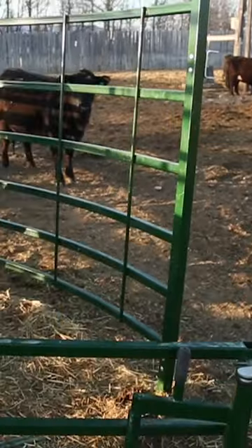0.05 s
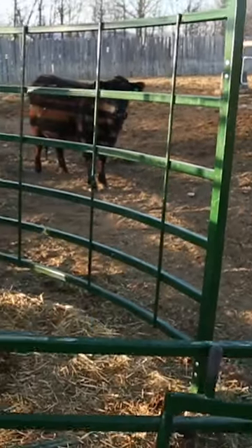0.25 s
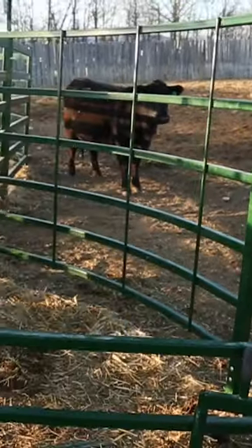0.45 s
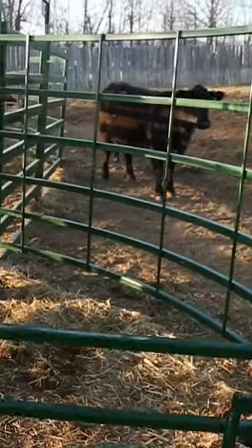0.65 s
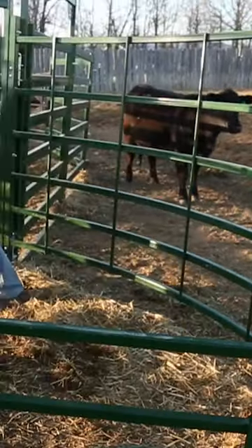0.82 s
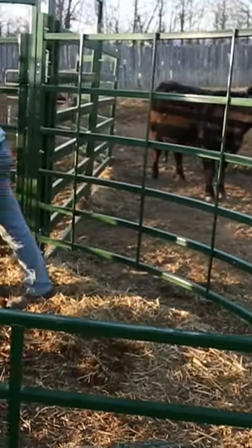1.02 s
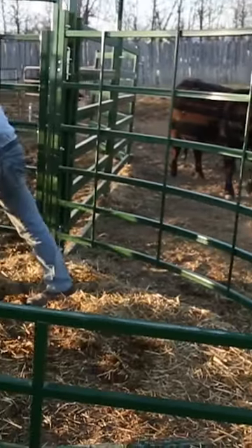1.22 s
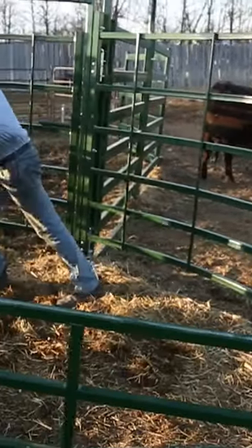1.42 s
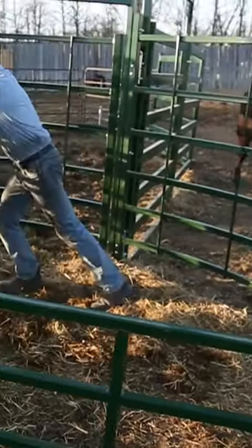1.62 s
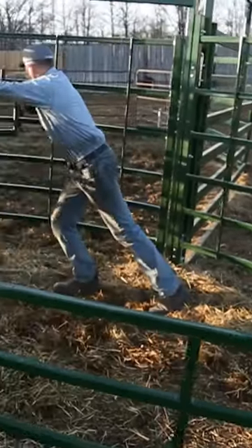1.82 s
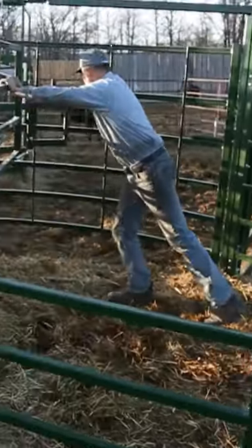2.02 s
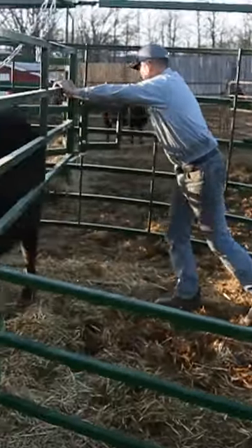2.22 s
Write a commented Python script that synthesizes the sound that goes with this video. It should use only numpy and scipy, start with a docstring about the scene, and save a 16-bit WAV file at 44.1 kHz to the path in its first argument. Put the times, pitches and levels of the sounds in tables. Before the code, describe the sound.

In an outdoor cattle pen, a nearby steel gate clangs loudly and rings, followed by a bright latch clink. A second round of bangs and clinks gives way to soft steps on straw and dirt.

```python
"""A straw-covered cattle pen, in faint outdoor air. A man pushes a curved steel tube gate round.
It bangs and rattles against the panels: each blow is a crack, a clash of tubes and a long panel ring.
Loose fittings ping, and the latch and a loose link clink in clear, high steel modes.
Feet rustle the straw in brief crackles and land on the dirt with dull thuds."""
import sys
import numpy as np
from scipy import signal
from scipy.fft import rfft, irfft
from scipy.io import wavfile

SR = 44100
rng = np.random.default_rng(int(sys.argv[2]) if len(sys.argv) > 2 else 0)


def file_out(sig):
    """Save sig as 16-bit WAV at sys.argv[1]."""
    # one column per channel
    cols = np.atleast_2d(sig).T
    # limit, then scale
    lim = np.clip(cols, -1, 1)
    pcm = np.round(lim * 32767).astype(np.int16)
    wavfile.write(sys.argv[1], SR, pcm)


N = 103635
T = np.arange(2 ** 16) / SR  # time axis of one hit, s


def amp(db):
    """Decibels to gain."""
    return 10 ** (np.asarray(db) / 20)


def unit(x):
    """Scales to rms 1."""
    return x / np.sqrt(np.mean(x ** 2) + 1e-20)


def curve_at(points, hz):
    """Reads a curve on a log-frequency axis."""
    f, value = np.transpose(points)
    return np.interp(np.log(hz + 1), np.log(f + 1), value)


def add(mix, start, sound):
    """Mixes a sound in at a time in seconds."""
    part = mix[max(round(start * SR), 0):][:len(sound)]
    part += sound[:len(part)]


def freqs(x):
    """Frequencies of the spectrum of x."""
    return np.fft.rfftfreq(len(x), 1 / SR)


def colour(x, eq):
    """Shapes x with an EQ curve, at rms 1."""
    return unit(irfft(rfft(x) * amp(curve_at(eq, freqs(x))), len(x)))


def treble_shelf(x, db, edge_hz=4300):
    """Lifts or lowers the treble."""
    return irfft(rfft(x) * amp(db / (1 + (edge_hz / (freqs(x) + 1)) ** 2)))


def rise(seconds):
    """A linear attack to full level."""
    return np.minimum(T / max(seconds, 1e-4), 1)


def grains(size, spread_db):
    """A dense run of tiny clicks of uneven size."""
    return rng.standard_normal(size) * amp(spread_db * np.minimum(rng.exponential(1, size), 4))


def mode_cloud(count, uneven_db=4):
    """Strengths of many close modes at random frequencies."""
    bins = len(freqs(T))
    return (rng.permutation(bins) < count) * amp(uneven_db * np.clip(rng.standard_normal(bins), -2, 2))


def strike(cloud, eq, decay):
    """Rings a mode cloud with fresh phases; each frequency dies at its own speed."""
    phases = np.exp(2j * np.pi * rng.random(len(cloud)))
    sustained = colour(irfft(cloud * phases), eq)
    hz, t, bands = signal.stft(sustained, SR, nperseg=256)
    fade = amp(-60 * t / curve_at(decay, hz)[:, None])
    return signal.istft(bands * fade, SR, nperseg=256)[1][:len(sustained)]


def flutter(depth_db=2.5, bandwidth_hz=55.4):
    """A quick random wavering of level."""
    noise = rng.standard_normal(len(T))
    wobble = irfft(rfft(noise) * np.exp(-(freqs(T) / bandwidth_hz) ** 2))
    return amp(depth_db * unit(wobble))


def ring(pitches, modes, twin_db=-9, max_beat_hz=18):
    """Decaying modes that flutter; each beats with a weaker twin, as in a slightly oval tube."""
    out, wavering = np.zeros(len(T)), flutter()
    for hz, (db, t60) in zip(pitches, modes):
        phase, twin_phase, split, lag = rng.random(4)
        tone = np.sin(2 * np.pi * (hz * T + phase))
        twin = np.sin(2 * np.pi * ((hz + max_beat_hz * (2 * split - 1)) * T + twin_phase))
        envelope = amp(db - 60 * T / t60) * np.roll(wavering, int(lag * len(T)))
        out += envelope * (tone + amp(twin_db) * twin)
    return out


# tone of the air bed: f/Hz, level/dB
AIR_EQ = [(25, -10), (65, 3.5), (150, 5), (400, 9.5), (1100, 7), (1700, 2.5), (5000, -4.5), (9000, -8.5),
          (16000, -15)]


def air():
    """Outdoor air: a faint, steady bed of soft noise."""
    return amp(-65.5) * colour(rng.standard_normal(N), AIR_EQ)


# gate blows, the last one a small bright clink: t/s, level/dB, attack/s, bass/dB, treble/dB, panel ring/dB,
# panel treble/dB, contact peak f/Hz, its boost/dB, gate modes/dB, post modes/dB
GATE_BLOWS = [(.036, -20.5, 0.042, 6.5, 14, 0.5, -4.5, 3300, 1, -2.5, -26),
              (.173, -15, 0.027, 10, 5, 3, 5.5, 2800, -2, -5, -4),
              (0.2484, -0.5, 0.00073, -8, -2, -1, 0, 2660, 3.5, 0.5, -29),
              (0.2581, -2, .0005, -2, -2.5, 1.5, -3.5, 1610, 6, -0.5, -26),
              (.482, -15.5, 0.011, 6.5, 4.5, 6, 1, 2360, 1.5, -1, -12),
              (.515, -20.5, 0.017, 13.5, 12.5, -4.5, 5.5, 230, 8, 0.5, -5),
              (.783, -32, 0.0086, -8.5, -9, -22, -8.5, 2560, 14.5, -21, -25),
              (1.334, -4, 0.0046, -2.5, 3.5, -2, -9.5, 5020, 1.5, -25, 0),
              (1.361, -11.5, 0.00095, 4, -11, -7, 8, 2880, 7.5, -10, -2),
              (1.522, -13, 0.0089, 8.5, -7.5, -2, -2, 1020, 9.5, -31, -1.5),
              (1.545, -10.5, 0.0035, 2.5, -0.5, -1.5, -7, 1050, 6, -13, -5.5),
              (1.563, -14, 0.003, 3, 2.5, -2.5, -8, 1280, 10, -5, -10),
              (2.15, -33.5, 0.017, 3, -6, 1, 1, 2430, 6.5, 0, -15),
              (2.3288, -23.5, 0.0013, -3, 10, -22, 0, 11400, 9, -13, -4)]
# first clash of the struck tubes: f/Hz, level/dB
TUBE_EQ = [(30, -70), (70, -30.5), (180, -16.5), (380, -16), (600, -7), (800, -5.5), (1250, -4.5),
           (1900, 0.5), (2700, 1.5), (4000, -4.5), (5200, -4), (7000, -14.5), (11000, -26), (14000, -27.5),
           (16000, -43)]
# its decay: f/Hz, t60/s
TUBE_DECAY = [(100, 0.72), (500, 0.5), (2000, 0.35), (5000, 0.31), (14000, 0.3)]
# long ring of the joined panels: f/Hz, level/dB
PANEL_EQ = [(40, -44), (120, -11.5), (250, -2), (350, -12), (460, 0.5), (600, -5), (750, -2), (1050, -0.5),
            (1500, -2.5), (2600, -1), (3300, -2), (4200, -12), (7000, -15), (11000, -25.5), (16000, -30.5)]
# its decay: f/Hz, t60/s
PANEL_DECAY = [(100, 1.2), (280, 0.47), (450, 1.63), (700, 0.85), (1200, 1.466), (2400, 0.9), (5000, 1.2),
               (14000, 1.56)]
# strongest modes of the gate: f/Hz
GATE_PITCHES = [296, 447, 618, 914, 1007, 1276, 1583, 1700, 1833, 1944, 2460, 2531, 3321, 4915]
# how each rings: level/dB, t60/s
GATE_RING = [(-11.5, 0.74), (-19, 2.6), (-3, 0.51), (-11, .7), (-6.5, 1.43), (-11, 1.24), (-4.5, 0.58),
             (-8, .9), (-10.5, 1.2), (-7.5, 0.95), (-9, .7), (-3, 0.78), (-3, 0.42), (-7, 0.41)]
# strongest modes of the post and panel it shuts against: f/Hz
POST_PITCHES = [213, 460, 1023, 1066, 1292, 1475, 2050, 2167, 2598, 2806, 2948, 3238, 3924, 4968]
# how each rings: level/dB, t60/s
POST_RING = [(-15.5, 0.64), (-20, 3.8), (-14, 1.4), (-16, 1.3), (-14, 1.2), (-5, 1.2), (6, .5), (-1, .75),
             (0.5, 1), (-9, 1), (3, 0.28), (-2, .7), (4.5, 0.13), (4, 0.18)]


def gate():
    """Each blow cracks, clashes in the near tubes and spreads into the ringing panels."""
    out, hz = np.zeros(N), freqs(T)
    tubes, panels = mode_cloud(count=2400), mode_cloud(count=2400)
    fade_out = np.clip(2 * (T[-1] - T) - .5, 0, 1)
    for (start, db, attack, bass_db, treble_db, panel_db, panel_treble_db,
         contact_hz, contact_db, gate_db, post_db) in GATE_BLOWS:
        crack = amp(-20.5) * colour(grains(len(T), spread_db=2), TUBE_EQ) * np.exp(-T / 0.0042)
        clash = amp(-22) * strike(tubes, TUBE_EQ, TUBE_DECAY)
        tail = treble_shelf(strike(panels, PANEL_EQ, PANEL_DECAY), panel_treble_db)
        tail *= amp(panel_db - 31) * rise(seconds=0.031)
        gate_tones = amp(gate_db - 36) * ring(GATE_PITCHES, GATE_RING)
        post_tones = amp(post_db - 38) * ring(POST_PITCHES, POST_RING)
        blow = crack + clash + tail + gate_tones + post_tones
        # each blow has its own EQ: a bell 0.15 octave to either side, and two shelves
        bell_db = contact_db / (1 + (np.log2((hz + 1) / contact_hz) / 0.15) ** 2)
        low_shelf_db = bass_db / (1 + (hz / 810) ** 2)
        blow = irfft(rfft(blow) * amp(bell_db + low_shelf_db))
        blow = treble_shelf(blow, treble_db)
        add(out, start, amp(db) * rise(attack) * fade_out * blow)
    return out


# light pings of loose fittings: t/s, level/dB, f/Hz, t60/s
FITTING_PINGS = [(.49, -60, 8110, 1), (0.679, -49.5, 3803, 0.35), (1.692, -41.5, 12200, 0.25),
                 (1.82, -70, 6700, 0.31), (1.825, -63.5, 6180, .3), (1.865, -65, 4930, 0.28),
                 (2.188, -56.5, 3970, 0.29)]


def fittings():
    """Loose fittings touch lightly and sound one beating mode each."""
    out = np.zeros(N)
    for start, db, hz, t60 in FITTING_PINGS:
        add(out, start, rise(seconds=0.014) * ring([hz], [(db, t60)]))
    return out


# scrape of steel on steel in a clink: f/Hz, level/dB
SCRAPE_EQ = [(100, -23.5), (750, -24), (1050, -15), (2400, -12), (2950, -5), (4000, -6.5), (5200, -1),
             (7000, -3), (9000, -9.5), (11500, -13.5), (12500, -18), (16000, -23)]
# its decay: f/Hz, t60/s
SCRAPE_DECAY = [(500, 1), (3000, 0.47), (6000, 0.23), (14000, 0.21)]


def clinks(hits, pitches, modes, tones_db, scrape_db, sparkle_above_hz=11000):
    """A small steel part is struck: a bright scrape and a few clear high modes."""
    out, body = np.zeros(N), mode_cloud(count=1100)
    for start, db, attack, scrape_trim_db, sparkle_db in hits:
        voiced = [(level + sparkle_db * (hz > sparkle_above_hz), t60)
                  for hz, (level, t60) in zip(pitches, modes)]
        tones = amp(tones_db) * ring(pitches, voiced)
        scrape = amp(scrape_db + scrape_trim_db) * strike(body, SCRAPE_EQ, SCRAPE_DECAY)
        add(out, start, amp(db) * rise(attack) * (tones + scrape))
    return out


# latch hits: t/s, level/dB, attack/s, scrape/dB, sparkle/dB
LATCH_DROPS = [(.8465, 1.5, 0.0065, 0.5, 2), (.925, -16, .004, 1, 7)]
# modes of the latch: f/Hz
LATCH_PITCHES = [3235, 3521, 3806, 4129, 4950, 5015, 5071, 5214, 5502, 5620, 5750, 6691, 12240, 12600]
# how each rings: level/dB, t60/s
LATCH_RING = [(-21.5, 2.06), (-8, 1), (-8.5, .52), (-11, 0.57), (-2, 0.46), (-2, 0.38), (2, 0.41), (-1, .4),
              (-4, 0.39), (-6, 0.35), (-4, 0.39), (-9, 0.22), (-10, 0.47), (-4, .2)]


def latch():
    """The steel latch drops with a bright clink, then a softer one."""
    return clinks(LATCH_DROPS, LATCH_PITCHES, LATCH_RING, tones_db=-40, scrape_db=-35.5)


# straw rustles: peak t/s, level/dB, half-width/s
STRAW_SWELLS = [(1.136, -64, 0.0075), (1.23, -69, .015), (1.994, -59, 0.015), (2.039, -57.5, 0.0037),
                (2.061, -65.5, 0.024), (2.125, -60, 0.0068), (2.176, -62.5, 0.037), (2.236, -69, 0.022)]
# tone of the crackle: f/Hz, level/dB
STRAW_EQ = [(200, 2.5), (1200, 2.5), (2600, -0.5), (5000, -3), (9000, -5.5), (16000, -10)]


def straw():
    """Stalks crackle in brief swells underfoot."""
    t = np.arange(N) / SR
    swells = sum(amp(db) * np.exp(-.5 * ((t - peak) / width) ** 2) for peak, db, width in STRAW_SWELLS)
    return swells * colour(grains(N, spread_db=8.5), STRAW_EQ)


# link hits: t/s, level/dB, attack/s, scrape/dB, sparkle/dB
LINK_STRIKES = [(1.611, -7.5, 0.0012, 7.5, -16), (1.624, 0.5, 0.0031, -1.5, 0.5),
                (2.189, -28, 0.0052, -15, 14)]
# modes of the link: f/Hz
LINK_PITCHES = [3915, 4129, 5566, 6705, 10790, 12188, 12600, 13160]
# how each rings: level/dB, t60/s
LINK_RING = [(-2.5, 0.29), (-13, 0.21), (1, 0.19), (1.5, 0.11), (-4.5, 0.14), (-4, 0.22), (-1, 0.22),
             (-7, 0.23)]


def link():
    """A loose link strikes steel with short, thin clinks."""
    return clinks(LINK_STRIKES, LINK_PITCHES, LINK_RING, tones_db=-37.5, scrape_db=-38.5)


# footfalls: t/s, level/dB, decay/s, high cut f/Hz
FOOTFALLS = [(1.911, -58, 0.025, 490), (1.94, -45, 0.0092, 1190), (1.9577, -46, 0.009, 1490),
             (1.977, -54, 0.0091, 353), (2.058, -52.5, 0.027, 1840), (2.118, -52, 0.028, 260),
             (2.164, -44, 0.015, 880), (2.19, -61, 0.036, 160)]


def footsteps(low_cut_hz=70, tail_db=-20.5, tail_s=0.12):
    """Feet hit packed dirt: short, dull bursts of noise with a faint tail."""
    out, hz = np.zeros(N), freqs(T)
    for start, db, decay, high_cut_hz in FOOTFALLS:
        band = 1 / np.sqrt((1 + (hz / high_cut_hz) ** 6) * (1 + (low_cut_hz / (hz + 1)) ** 6))
        thud = unit(irfft(rfft(rng.standard_normal(len(T))) * band))
        envelope = rise(seconds=0.0034) * (np.exp(-T / decay) + amp(tail_db) * np.exp(-T / tail_s))
        add(out, start, amp(db) * envelope * thud)
    return out


def scene():
    """Mono mix of steel, feet and open air."""
    return (latch() + link() + air() + footsteps() + straw() + gate() + fittings())[None]


def record(dry, low_cut_hz=60, high_cut_hz=15950):
    """Master EQ: trims the rumble and the very top."""
    trimmed = signal.sosfilt(signal.butter(2, low_cut_hz, "highpass", fs=SR, output="sos"), dry)
    high_cut = signal.firwin(511, high_cut_hz, window=("kaiser", 9), fs=SR)
    return signal.oaconvolve(trimmed, high_cut[None], "same")


dry = scene()
out = record(dry)
file_out(out)
```